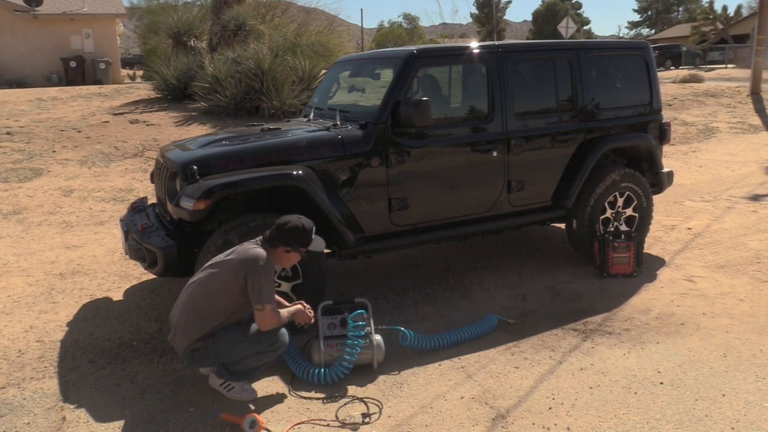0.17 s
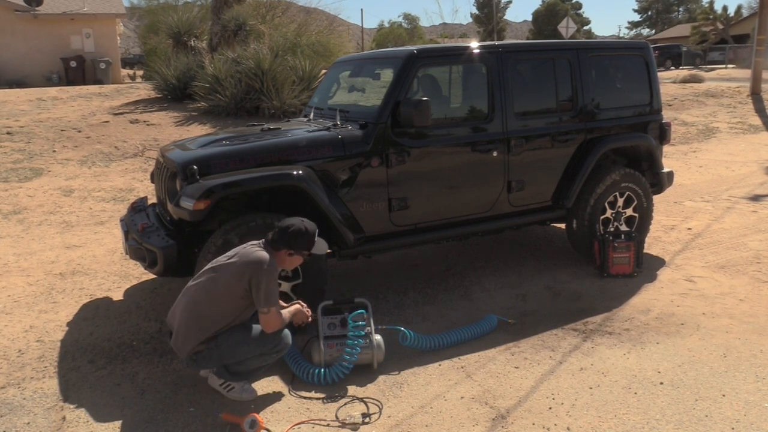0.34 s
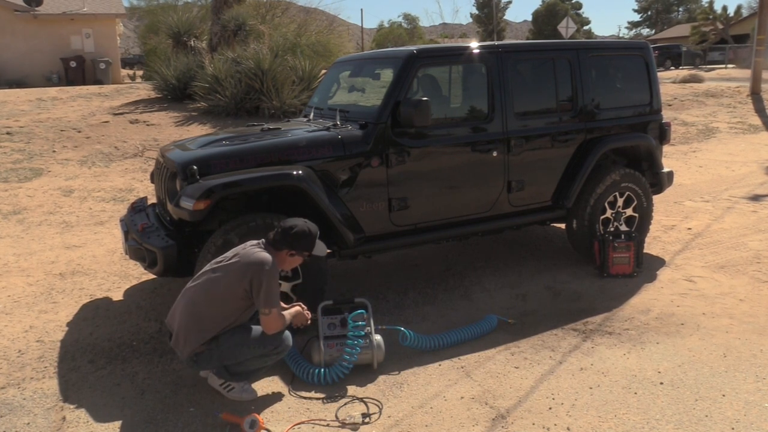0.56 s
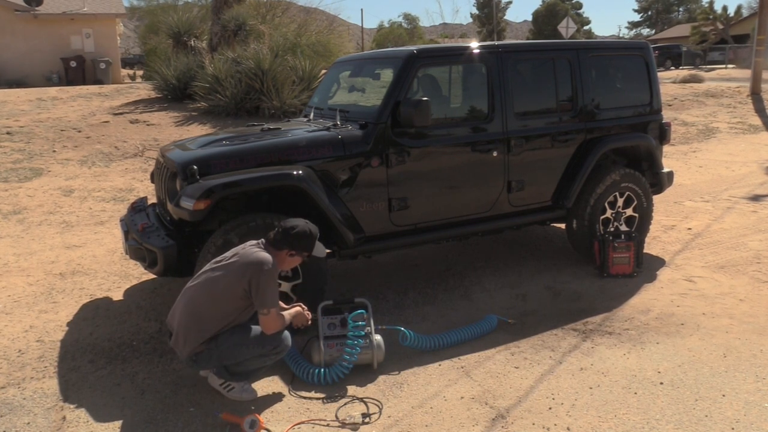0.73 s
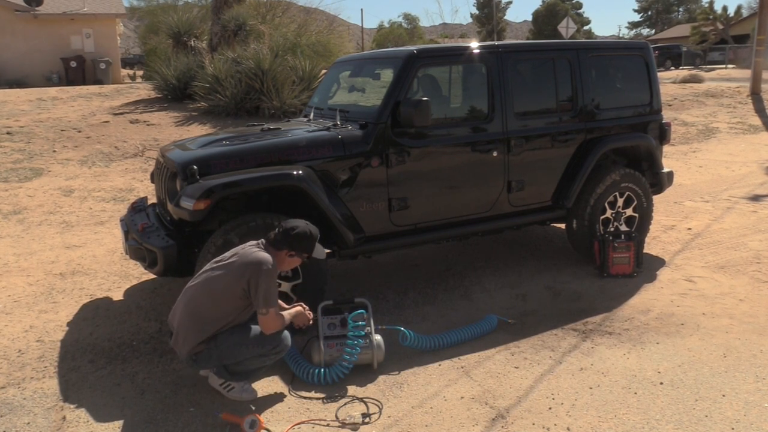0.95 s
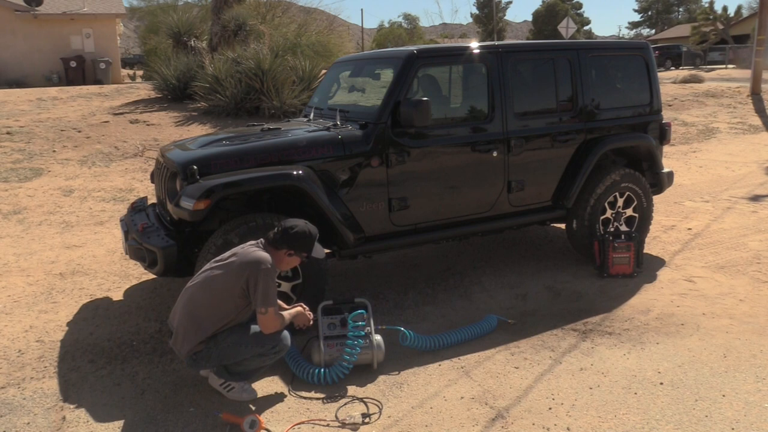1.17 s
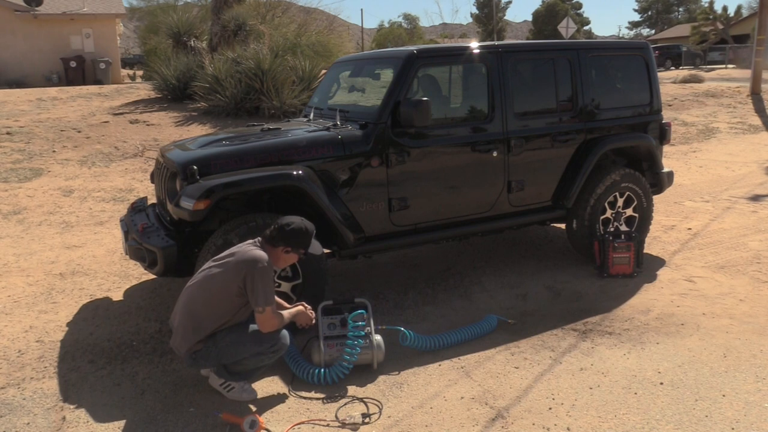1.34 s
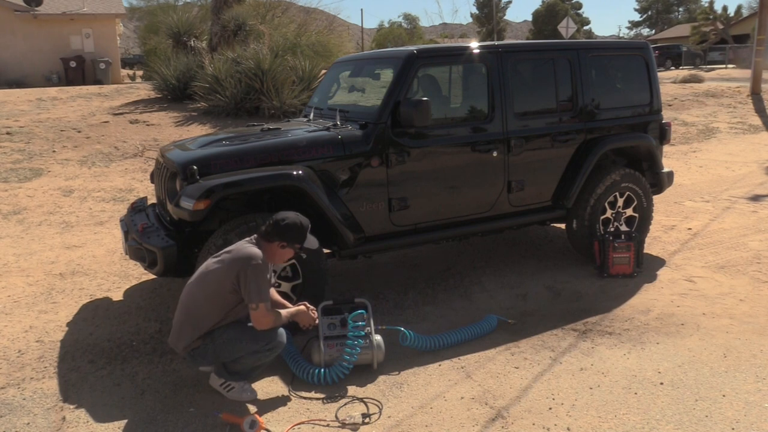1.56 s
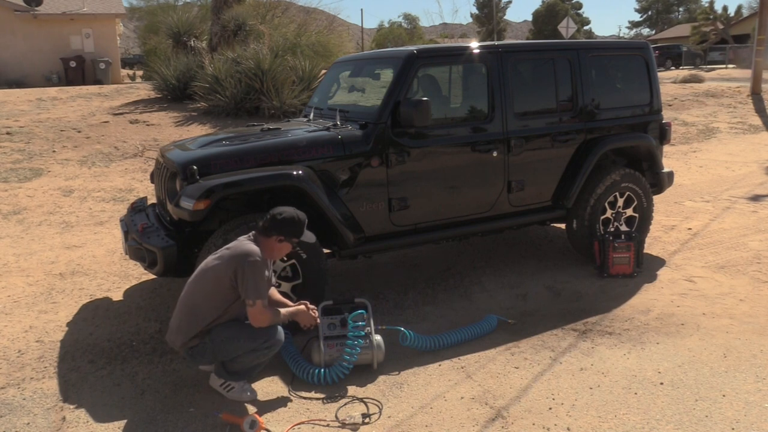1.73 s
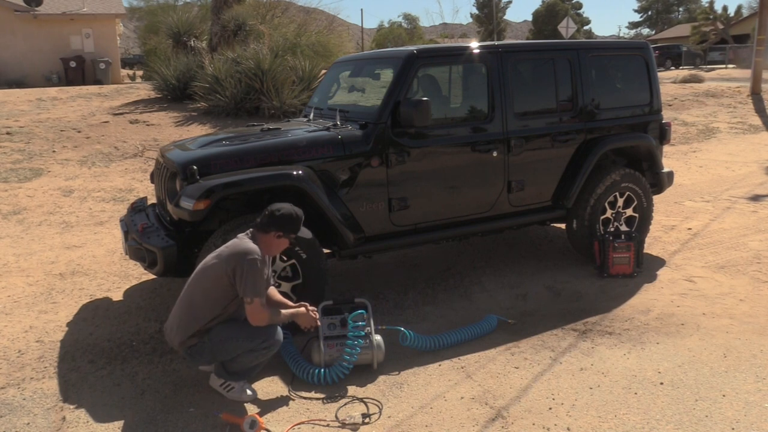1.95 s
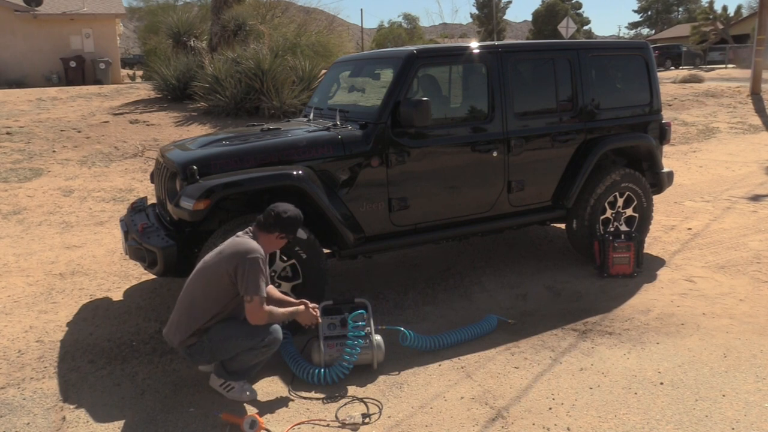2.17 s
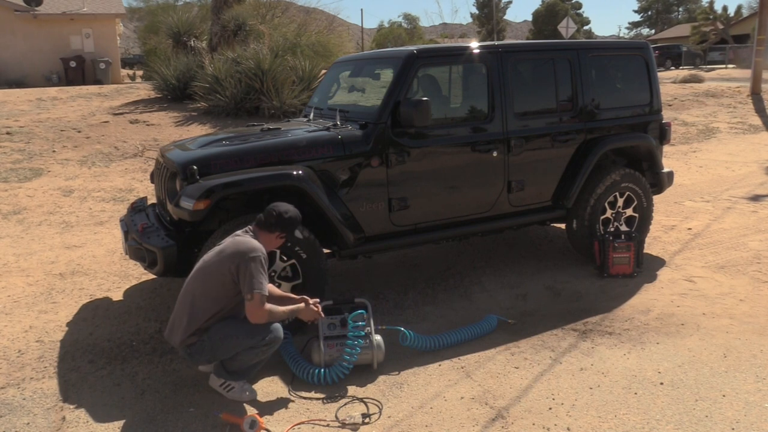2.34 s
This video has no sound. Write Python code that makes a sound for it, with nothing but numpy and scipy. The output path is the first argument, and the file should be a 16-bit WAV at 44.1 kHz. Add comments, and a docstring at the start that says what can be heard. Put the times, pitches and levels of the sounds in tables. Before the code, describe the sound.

Portable air compressor rattling and hissing at constant speed in the open, heard from a few metres; heavy low wind thumps and rasping with tiny crackles come early, lighter puffs later, then mostly machine.

```python
"""Outdoors, a small piston air compressor runs a few metres from the microphone in gusty wind.
Four knocks a turn, one of them faint, ring modes of its housing; air hisses through the valves and
puffs twice a turn; motor tones hum with the shaft. Wind buffets the microphone: shaped noise makes
the flutter, rumble and rasp, short pulses the low thumps, and tiny noise bursts a few crackles."""
import sys
import numpy as np
from scipy import signal
from scipy.fft import rfft, irfft
from scipy.io import wavfile
from scipy.ndimage import uniform_filter1d

SR = 44100
rng = np.random.default_rng(int(sys.argv[2]) if len(sys.argv) > 2 else 0)


def unload_wav(signal):
    """Save mono or channel-first audio to the path in sys.argv[1] as 16-bit WAV at rate SR, clipped to [-1, 1]."""
    wavfile.write(
        sys.argv[1],
        SR,
        np.round(np.clip(np.atleast_2d(signal).T, -1, 1) * 32767).astype(np.int16),
    )


def voltage_ratio(decibels):
    """Convert decibels (scalar or array-like) to amplitude ratios, 20 dB per decade."""
    exponent = np.asarray(decibels, float) / 20
    return 10 ** exponent


N = 105840  # samples

# knocks in one turn: (gain into low modes [dB], gain into high modes [dB])
KNOCKS = [(0.5, 0), (-20, -9.5), (0.5, 6), (-0.5, 5)]
# housing modes: (frequency [Hz], bandwidth [Hz], gain [dB])
HOUSING_MODES = [(460, 38, -13), (650, 82, -8), (873, 88, 4), (1010, 13, 4.5), (1066, 25, 4),
                 (1212, 74, -2), (1320, 140, -6.5), (1492, 35, -7.5), (1766, 19, -2.5), (1925, 66, 3.5),
                 (1900, 40, -18.5), (2517, 68, -4.5), (3130, 20, 5), (3568, 55, -0.5)]
# resonances excited by the air flow: (frequency [Hz], bandwidth [Hz], gain [dB])
FLOW_PEAKS = [(1903, 138, 1.5), (2687, 73, -3), (3284, 14, -6.5), (3310, 38, 3.5), (3667, 46, -5.5),
              (3725, 29, -9.5), (4316, 57, -5), (4550, 54, -15.5), (6170, 540, -15), (7920, 290, -10.5),
              (8760, 38, -7.5), (9300, 45, -38), (12000, 58, -10)]
# colour of the valve hiss: (frequency [Hz], relative gain [dB])
HISS_COLOUR = [(180, -54), (300, -51), (446, -40), (477, -23), (631, -3), (663, -17), (1200, 0), (1400, -3),
               (1910, -8.5), (2140, -2), (3190, -5.5), (7780, -17), (15600, -28.5)]
# swells and dips of the hiss: (place in turn [0-1], change before band depth [dB], spread [turns])
PUFFS = [(.07, 10.5, 0.1), (.64, 9.5, 0.06), (.82, -1.5, 0.12)]
# centres of the puff bands: (frequency [Hz], ...)
PUFF_BANDS = (3500, 5000, 7000, 9500, 13000)
# share of the puff change heard in each band: (share [0-1], ...)
PUFF_DEPTHS = (0.34, 0.41, 0.79, 0.3, 0.37)
# motor tones: (frequency [Hz], rms before the machine level [dB])
MOTOR_TONES = [(484.7, -57.5), (684.2, -62.5), (1482.5, -63.5), (4390, -59)]
# compressor level, used relative to its mean: (time [s], level [dB])
MACHINE_LEVEL = [(0.0, -45.5), (0.05, -46), (0.72, -46.5), (0.88, -50), (1.12, -50), (1.19, -46),
                 (1.65, -48.5), (1.83, -46.5), (2.39, -46), (2.4, -42)]
# side colour of the compressor's air: (frequency [Hz], gain [dB])
AIR_SIDE_COLOUR = [(2300, -70), (2600, -21), (3000, -17.5), (3400, -27), (3900, -20), (4200, -9),
                   (8000, -6.5), (15700, -3)]
# gusts on the microphone: (time [s], level before trim [dB], gain above 350 Hz [dB])
GUSTS = [(0.0, -44, 2), (0.05, -29, -20), (0.09, -37.5, -2), (0.21, -30, -11.5), (0.25, -17.5, -3.5),
         (0.27, -36, 2), (0.29, -23, 6), (0.29, -12, -2), (0.39, -22.5, 6.5), (0.41, -18.5, 3.5),
         (0.44, -15, 1), (0.47, -12, -4.5), (0.49, -15, 2), (0.51, -19.5, 10.5), (0.57, -16.5, 5),
         (0.59, -23, -6), (0.65, -34, -16), (0.71, -17.5, 2), (0.85, -27.5, 8), (0.91, -24, 5),
         (0.93, -37.5, 2.5), (0.94, -25.5, 1), (1.0, -36, -5), (1.02, -25.5, -9.5), (1.07, -28.5, -11),
         (1.08, -24.5, 0), (1.24, -25.5, -2.5), (1.3, -20, 1), (1.46, -27.5, -6.5), (1.48, -27, -1),
         (1.5, -19.5, -7.5), (1.56, -24.5, 5), (1.62, -36, 1), (1.7, -26.5, 3.5), (1.72, -30, -2),
         (1.82, -35, -9), (2.14, -49, -1), (2.35, -32.5, -11.5), (2.4, -41, -12)]
# colour of the buffeting: (frequency [Hz], relative gain [dB])
BUFFET_COLOUR = [(15, -74), (25, -72), (48, -17), (97, -16), (159, 2.5), (236, 2), (280, 2), (415, -0.5),
                 (637, -13), (824, -29), (1500, -33.5), (1950, -107), (3300, -120)]
# deep rumble of the wind: (time [s], level before trim [dB])
RUMBLE_LEVEL = [(0.0, -44.5), (0.26, -33), (0.57, -39), (0.62, -50), (0.71, -24), (0.79, -43), (1.17, -49),
                (1.38, -41), (1.48, -45), (1.51, -38), (1.74, -48), (2.19, -54), (2.31, -37.5), (2.4, -43)]
# colour of the rumble: (frequency [Hz], relative gain [dB])
RUMBLE_COLOUR = [(15, -85), (25, -62), (80, -14), (108, -5.5), (145, -7.5), (177, -10), (200, -9),
                 (260, -8), (440, -120)]
# rasp of the wind: (time [s], level before trim [dB])
RASP_LEVEL = [(0.15, -41.5), (0.274, -39), (0.292, -29), (0.448, -35.5), (0.466, -20), (0.484, -35),
              (0.502, -31), (0.646, -41), (0.756, -30.5), (0.816, -37), (0.848, -58), (0.902, -39),
              (0.912, -51), (1.036, -49), (1.262, -39.5), (1.27, -41.5), (1.538, -43.5), (1.542, -40),
              (1.582, -42), (1.588, -53), (1.794, -47), (1.8, -40.5)]
# colour of the rasp in the middle: (frequency [Hz], relative gain [dB])
RASP_COLOUR = [(400, 8), (800, 2), (1500, 2), (3000, -6), (5000, -24), (8000, -57)]
# colour of the rasp's difference between channels: (frequency [Hz], relative gain [dB])
RASP_SIDE_COLOUR = [(300, -50), (500, -1.5), (1000, -3), (2000, -3), (3500, -5), (5000, -23)]
# thumps: (time [s], size before the wind low cut [dB], frequency [Hz])
THUMPS = [(0.292, -5.5, 383), (0.316, -7.5, 375), (0.404, -14, 315), (0.41, -13, 301), (0.432, -8.5, 358),
          (0.456, -1, 327), (0.465, -4, 301), (0.469, -13, 306), (0.473, -13, 345), (0.513, 1, 368),
          (0.519, -12, 400), (0.543, -17, 363), (0.558, -19, 369), (0.706, -13, 307), (0.716, -10.5, 390),
          (0.76, -9, 327), (0.767, -11, 423), (0.811, -9, 365), (0.849, -15, 331), (0.871, -14, 505),
          (0.901, -11, 342), (1.482, -12.5, 330), (1.543, -19, 303), (1.558, -9, 356), (1.654, -17, 308),
          (1.698, -13.5, 320)]
# crackles: (time [s], peak in the middle [dB], frequency [Hz])
CRACKLES = [(.4065, -21, 3900), (.4595, -16, 4300), (.4690, -18, 3600), (.5015, -27, 2800),
            (.5120, -25, 2900)]

SHAFT_HZ, SHAFT_WANDER = 28.51, .0004  # turns per second; scale of its fractional drift
KNOCK_START, KNOCK_STEP = .035, .2435  # first knock and spacing, in turns
KNOCK_SCATTER_DB, KNOCK_JITTER_S = 2.55, .00004
MODE_SPLIT_HZ = 1350  # between low and high housing modes
KNOCK_DB, HISS_DB, FLOW_PEAKS_DB = -42.5, -41.5, -49
REPEAT = .78  # share of the clatter kept from turn to turn
CLATTER_TOP_HZ, FREE_DB = 4420, -2  # top of the clatter; gain of the free noise under it
PUFF_SCATTER_DB = 1.3
RIGHT_SHARE = .15  # treble leans right
BUFFET_DB, SKEW = -2.5, .13  # trim; lopsidedness of the pressure swings
EDDY_DB, EDDY_HZ = 3, 140  # depth and rate of the eddies
RASP_DB, RASP_SIDE_DB = -1, -9.5
RASP_SPLIT_DB, RASP_SPLIT_SOFT_DB = -41.5, 2  # the rasp widens around this table level
THUMP_CYCLES = .61
WIND_CUT_HZ = 137
CRACKLE_S, CRACKLE_WIDTH_HZ = .0009, 1500
LIMIT, LOW_CUT_HZ, TOP_HZ = 1.1, 55, 14300


def curve(table, t):
    """Straight lines through (time, value) rows."""
    return np.interp(t, *np.array(table).T[:2])


def on_log(table, hz):
    """Straight lines on a log-frequency axis, -120 dB outside the table."""
    a = np.array(table)
    log_hz = np.log(np.maximum(a[:, 0], 1))
    return np.interp(np.log(np.maximum(hz, 1)), log_hz, a[:, 1], left=-120, right=-120)


def white():
    """White noise."""
    return rng.standard_normal(N)


def unit(x):
    """Scale to rms 1."""
    return x / np.sqrt(np.mean(x ** 2))


def colour(x, db):
    """Filter by a gain in dB given as a function of frequency."""
    return irfft(rfft(x) * voltage_ratio(db(np.fft.rfftfreq(N, 1 / SR))), N)


def colour_by(x, table):
    """Filter by a table of frequency and gain."""
    return colour(x, lambda hz: on_log(table, hz))


def above(x, corner, power):
    """Keep what lies above a corner frequency, with a smooth slope below it."""
    return colour(x, lambda hz: -10 * np.log10(1 + (corner / (hz + 1)) ** power))


def ring(x, hz, width):
    """One resonance, gain 1 at its centre."""
    return signal.lfilter(*signal.iirpeak(hz, hz / width, SR), x)


def walk(rate):
    """Random levels held 1 / rate s and slewed twice."""
    k = int(SR / rate)
    held = np.repeat(rng.standard_normal(N // k + 1), k)
    return .85 * uniform_filter1d(uniform_filter1d(held, k), k)[:N]


def knocks(t, turn):
    """Impulses at the same places on every turn ring the housing modes."""
    low, high = np.zeros(N + 2), np.zeros(N + 2)
    turns = np.arange(int(turn[-1]))
    for k, (low_db, high_db) in enumerate(KNOCKS):
        place = KNOCK_START + k * KNOCK_STEP
        jitter, scatter = rng.standard_normal((len(turns), 2)).T
        when = np.interp(turns + place, turn, t) + KNOCK_JITTER_S * jitter
        at = np.clip(when * SR, 0, N - 1)
        i = at.astype(int)
        for out, db in ((low, low_db), (high, high_db)):
            size = voltage_ratio(db + KNOCK_SCATTER_DB * scatter)
            # share each impulse between two samples for exact timing
            out[i] += size * (1 - at + i)
            out[i + 1] += size * (at - i)
    body = np.zeros(N)
    for k, (hz, width, db) in enumerate(HOUSING_MODES):
        hits = low if hz < MODE_SPLIT_HZ else high
        body += (-1) ** k * voltage_ratio(db) * ring(hits[:N], hz, width)
    return unit(body)


def clatter(turn):
    """Noise that nearly repeats on every turn of the shaft."""
    size = int(SR / SHAFT_HZ)
    fresh = rng.standard_normal((int(turn[-1]) + 22, size))
    # each row is one turn, mostly a copy of the last; the first 20 settle
    rows = signal.lfilter([np.sqrt(1 - REPEAT ** 2)], [1, -REPEAT], fresh, axis=0)[20:]
    return unit(np.interp(turn * size, np.arange(rows.size), rows.ravel()))


def puffs(steady, turn):
    """The air flow swells and thins at set places in the turn, band by band."""
    out = steady
    for centre, depth in zip(PUFF_BANDS, PUFF_DEPTHS):
        puff_db = 1.02 * walk(20)
        for place, db, length in PUFFS:
            size = depth * db + PUFF_SCATTER_DB * rng.standard_normal(int(turn[-1]) + 3)
            d = turn - place + .5
            puff_db = puff_db + size[d.astype(int) + 1] * np.exp(-.5 * ((d % 1 - .5) / length) ** 2)

        def band_db(hz):
            octave = np.clip(np.log(hz / centre + 1e-6) / np.log(1.4), -1, 1)
            return 20 * np.log10(1e-6 + np.cos(octave * np.pi / 2) ** 2)

        out = out + colour(steady, band_db) * (voltage_ratio(puff_db) - 1)
    return out


def air(turn):
    """Repeating clatter below and free noise above become hiss and narrow singing resonances."""
    free = colour(white(), lambda hz: FREE_DB / (1 + (hz / CLATTER_TOP_HZ) ** 4))
    repeating = colour(clatter(turn), lambda hz: -10 * np.log10(1 + (hz / CLATTER_TOP_HZ) ** 4))
    noise = above(free, 1500, 4) + repeating
    hiss = unit(colour_by(noise, HISS_COLOUR))
    peaks = unit(sum(voltage_ratio(db) * ring(noise, hz, width) for hz, width, db in FLOW_PEAKS))
    return puffs(voltage_ratio(HISS_DB) * hiss + voltage_ratio(FLOW_PEAKS_DB) * peaks, turn)


def motor_tones(turn):
    """Sines follow the shaft, wavering a little in level and phase."""
    out = np.zeros(N)
    for hz, db in MOTOR_TONES:
        level = np.sqrt(2) * voltage_ratio(db + 1.3 * walk(9.4))
        wobble = .000047 * hz * walk(23.8)
        out += level * np.sin(2 * np.pi * hz * turn / SHAFT_HZ + wobble)
    return out


def compressor(t):
    """One shaft drives knocks, air and tones; only the treble spreads between the channels."""
    turn = SHAFT_HZ * t + SHAFT_WANDER * np.cumsum(walk(3.91)) * SHAFT_HZ / SR
    mid = voltage_ratio(KNOCK_DB) * knocks(t, turn) + air(turn) + motor_tones(turn)
    side = colour_by(air(turn), AIR_SIDE_COLOUR) - RIGHT_SHARE * above(mid, 4200, 24)
    level = curve(MACHINE_LEVEL, t)
    return voltage_ratio(level - level.mean()) * np.array([mid + side, mid - side])


def buffeting(t, gust_db):
    """Eddies shake the microphone with noise whose pressure swings are lopsided."""
    flutter = unit(colour_by(white() * voltage_ratio(EDDY_DB * walk(EDDY_HZ)), BUFFET_COLOUR))
    tilt_db = curve(np.array(GUSTS)[:, ::2], t)
    flutter = flutter + above(flutter, 350, 6) * (voltage_ratio(tilt_db) - 1)
    return (flutter + SKEW * flutter ** 2) * voltage_ratio(gust_db + BUFFET_DB)


def rumble(t):
    """Deep noise swells and sinks with the wind."""
    return unit(colour_by(white(), RUMBLE_COLOUR)) * voltage_ratio(curve(RUMBLE_LEVEL, t) - 2.5)


def rasp(t, low, gust_db):
    """Noise bursts out on the pressure peaks and widens as it gets stronger; returns mid and side."""
    level = curve(RASP_LEVEL, t)
    swing = np.abs(low) / voltage_ratio(gust_db)
    drive = voltage_ratio(level + RASP_DB) * unit(.52 + swing) * (t < RASP_LEVEL[-1][0])
    mid = unit(colour_by(white(), RASP_COLOUR)) * drive
    side = unit(colour_by(white(), RASP_SIDE_COLOUR)) * drive
    spread = 1 / (1 + np.exp((RASP_SPLIT_DB - level) / RASP_SPLIT_SOFT_DB)) ** 3
    return mid, side * voltage_ratio(RASP_SIDE_DB) * spread


def thumps(t):
    """Pressure pulses under a bell-shaped envelope, each about a cycle long."""
    out = np.zeros(N)
    for s, db, hz in THUMPS:
        u = (t - s) * hz - .5
        out += voltage_ratio(db) * np.exp(-.5 * (u / THUMP_CYCLES * 2) ** 2) * np.cos(2 * np.pi * u - .5)
    return out


def crackles(t):
    """Tiny bursts of noise squeezed through three stacked resonances."""
    out = np.zeros(N)
    for s, db, hz in CRACKLES:
        grain = white()
        for width in (CRACKLE_WIDTH_HZ, CRACKLE_WIDTH_HZ, 2 * CRACKLE_WIDTH_HZ):
            grain = ring(grain, hz, width)
        burst = np.exp(-.5 * ((t - s) / CRACKLE_S) ** 2) * grain
        out += voltage_ratio(db) * burst / np.abs(burst).max()
    return out


def wind(t):
    """Buffeting and thumps drive the rasp; rumble and crackles join them."""
    gust_db = curve(GUSTS, t)
    low_cut = signal.butter(3, WIND_CUT_HZ, "high", fs=SR, output="sos")
    low = signal.sosfilt(low_cut, buffeting(t, gust_db) + thumps(t))
    deep = rumble(t)
    mid, side = rasp(t, low, gust_db)
    snaps = crackles(t)
    mid, side = mid + snaps, side + .5 * snaps  # crackles lean left
    return low + deep + np.array([mid + side, mid - side])


def scene():
    """Compressor and wind."""
    t = np.arange(N) / SR
    return compressor(t) + wind(t)


def roll_off(x):
    """The treble ends steeply here."""
    return signal.sosfilt(signal.butter(12, 15730, fs=SR, output="sos"), x)


def record(dry):
    """Round the loudest peaks, cut the deepest bass and dull the top."""
    low_cut = signal.butter(2, LOW_CUT_HZ, "high", fs=SR, output="sos")
    top_cut = signal.butter(4, TOP_HZ, fs=SR, output="sos")
    rounded = LIMIT * np.tanh(dry / LIMIT)
    mix = signal.sosfilt(top_cut, signal.sosfilt(low_cut, rounded))
    return roll_off(mix)


dry = scene()
out = record(dry)
unload_wav(out)
```